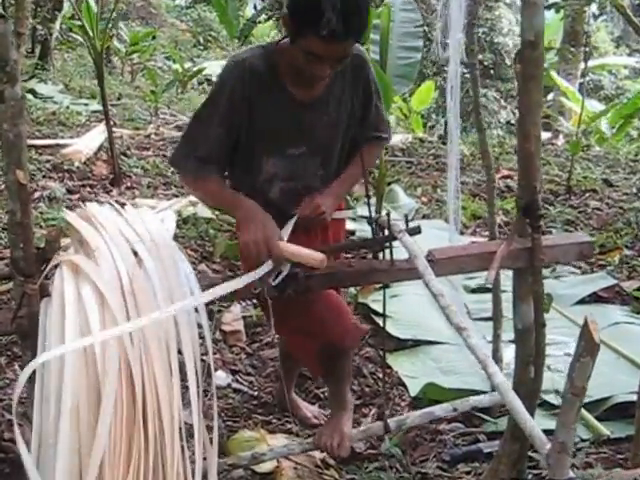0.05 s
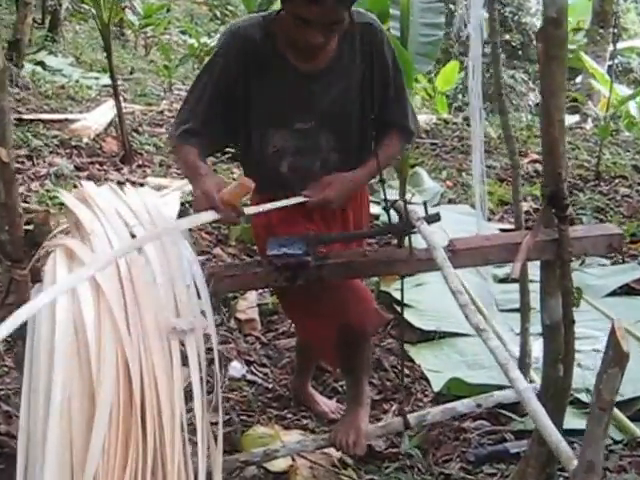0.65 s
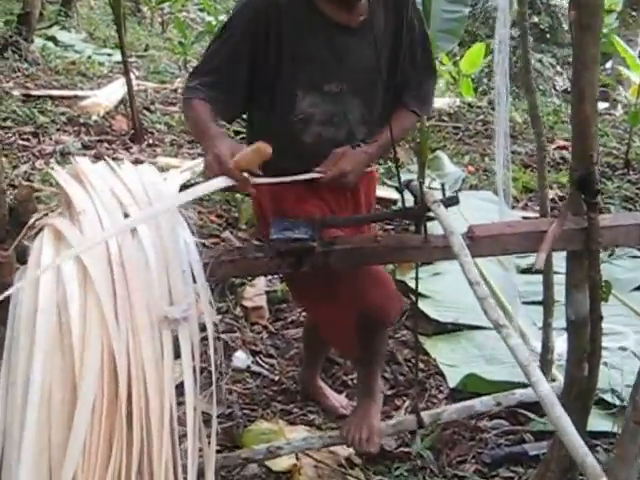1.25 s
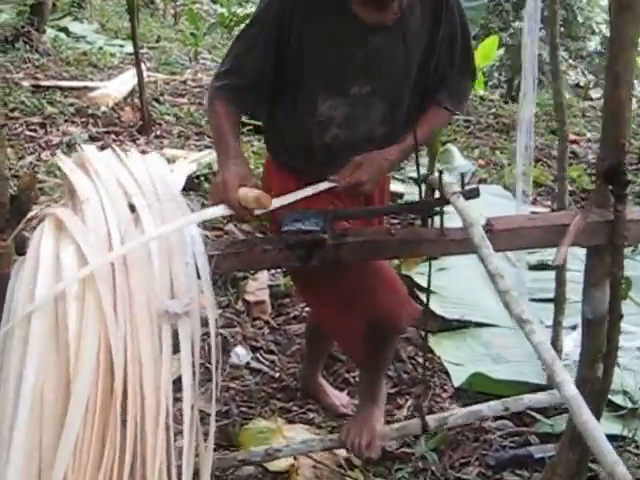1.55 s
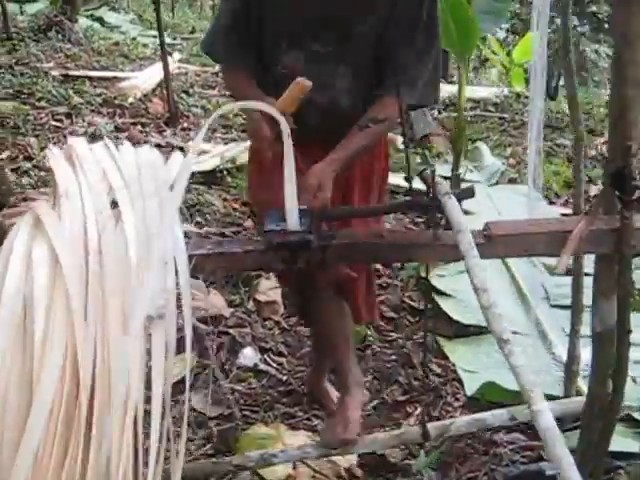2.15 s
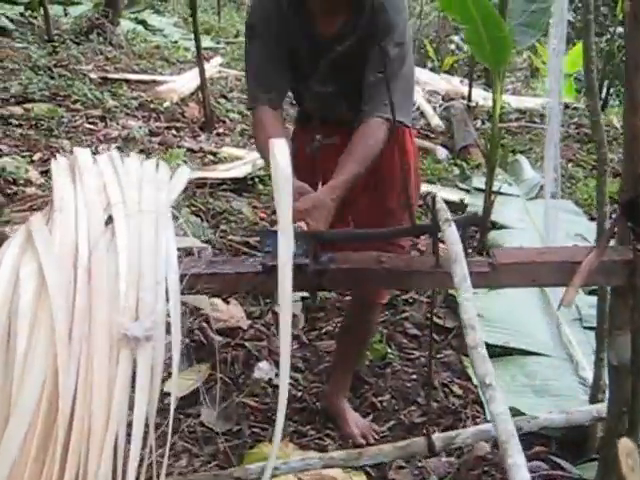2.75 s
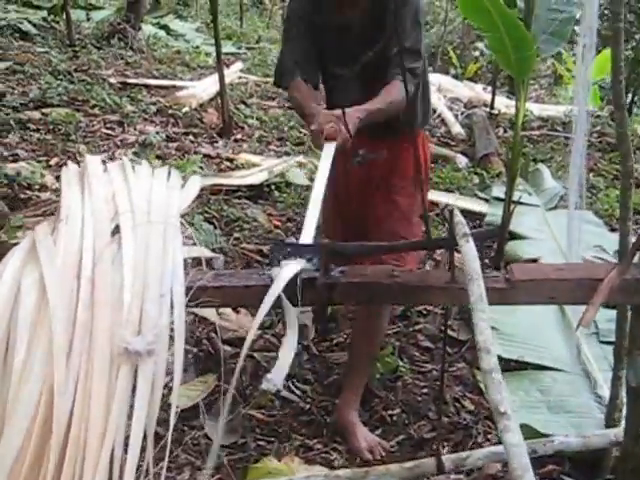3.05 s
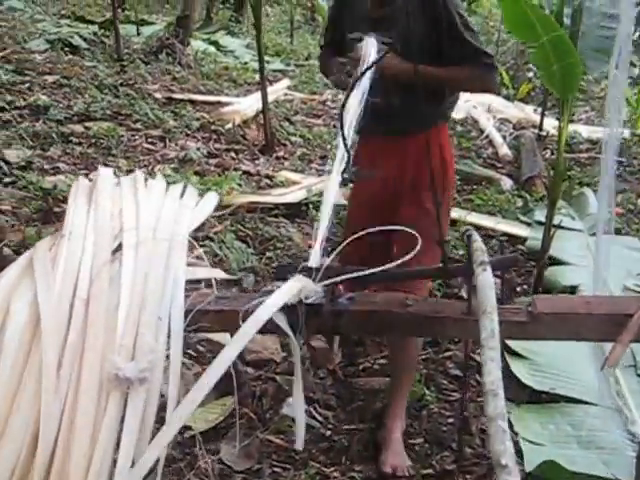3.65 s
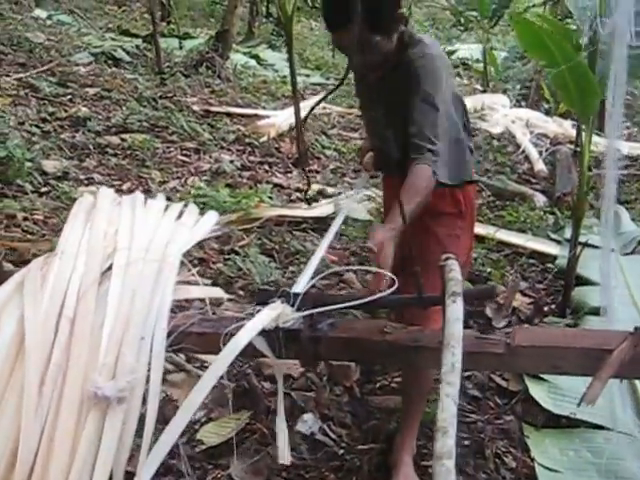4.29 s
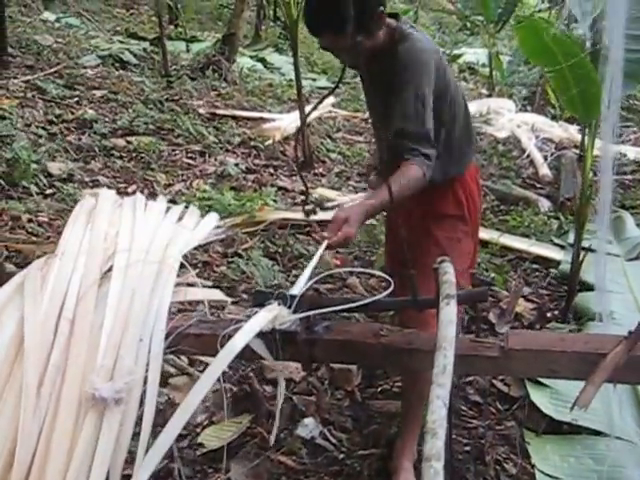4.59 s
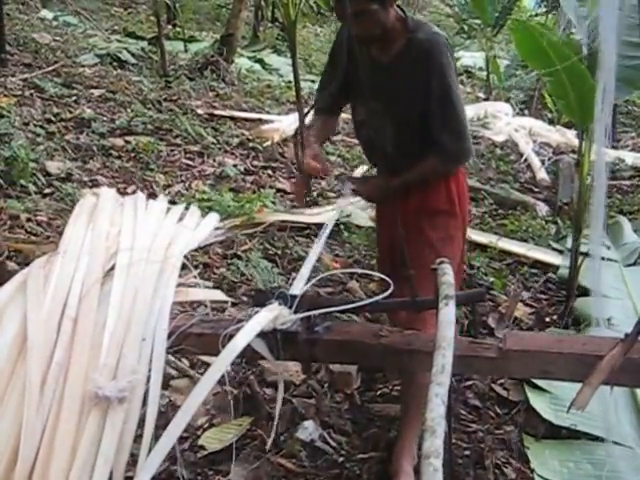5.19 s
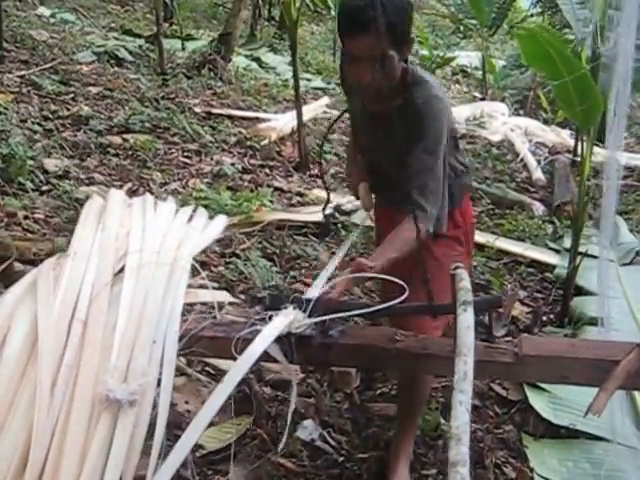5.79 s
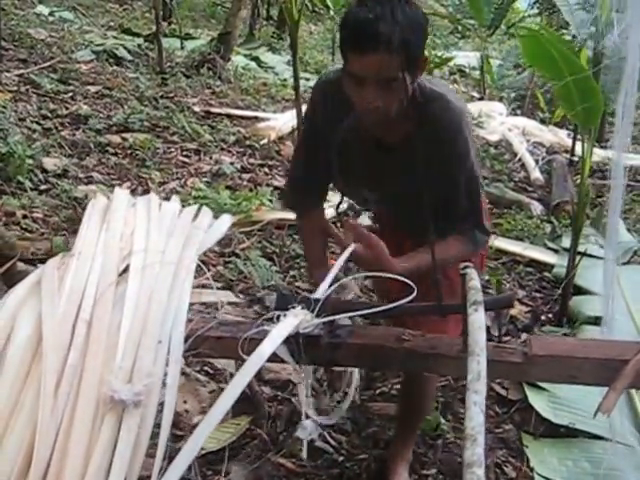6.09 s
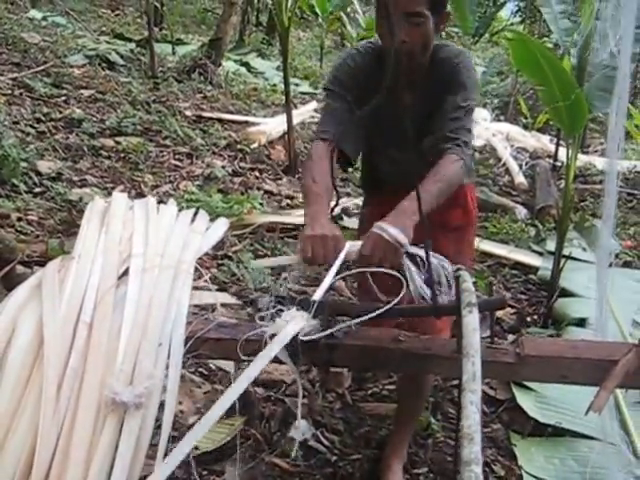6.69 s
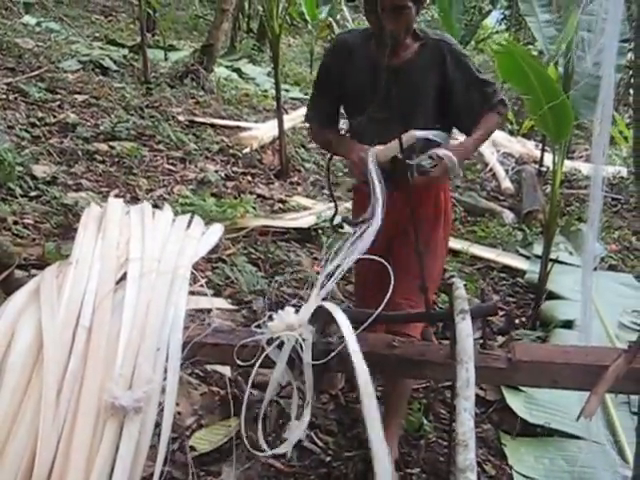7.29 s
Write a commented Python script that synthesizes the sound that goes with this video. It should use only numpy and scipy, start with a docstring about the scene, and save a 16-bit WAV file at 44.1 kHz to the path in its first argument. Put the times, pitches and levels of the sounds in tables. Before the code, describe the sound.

Insects drone outdoors while fibre strips are handled and twice scraped under a blade, one tearing free with a snap.

```python
"""Insects drone outdoors, the nearest in quick falling chirps; a thin high whistle sinks away.
Strips of plant fibre rustle and tick as they are handled, among knocks of knife, clamp and feet.
Twice a strip is drawn under a blade clamped to a wooden beam, and rasps as it sticks and slips.
The first tears free with a snap; after two faint far calls, the second catches, then runs."""
import sys
import numpy as np
from scipy import signal
from scipy.fft import rfft, irfft, next_fast_len
from scipy.io import wavfile

SR = 44100
rng = np.random.default_rng(int(sys.argv[2]) if len(sys.argv) > 2 else 0)


def log_audio(samples):
    """Write samples as a 16-bit WAV file to the path given in sys.argv[1]."""
    # one column per channel
    frames = np.atleast_2d(samples).T
    # limit to full scale, then quantise
    limited = np.clip(frames, -1, 1)
    pcm = np.round(limited * 32767).astype(np.int16)
    wavfile.write(sys.argv[1], SR, pcm)


N = 323615
TIME = np.arange(N) / SR


def from_db(db):
    """Decibels to gain."""
    return 10 ** (np.asarray(db) / 20)


def rms_one(x):
    """Scale to rms 1."""
    return x / np.sqrt(np.mean(x ** 2) + 1e-20)


def in_time(rows):
    """Columns of a (time_s, ...) curve at every sample."""
    time_s, *columns = np.transpose(rows)
    return [np.interp(TIME, time_s, column) for column in columns]


def colour(x, spectrum):
    """Filter by a (freq_hz, gain_db) curve; rms 1."""
    size = next_fast_len(N)
    hz, db = np.transpose(spectrum)
    bins_hz = np.maximum(np.arange(size // 2 + 1) * SR / size, 1)
    gain = from_db(np.interp(np.log(bins_hz), np.log(hz), db))
    return rms_one(irfft(rfft(x, size) * gain, size)[:N])


def drift(rate_hz):
    """Slow random wander; rms 1."""
    r = np.exp(-80 * np.pi * rate_hz / SR)
    slow = signal.lfilter([1], [1, -2 * r, r * r], rng.standard_normal(N // 40 + 2002))[2000:]
    return np.interp(np.arange(N) / 40, np.arange(len(slow)), rms_one(slow))


def sine(hz):
    """Tone following a pitch curve."""
    return np.sin(2 * np.pi * np.cumsum(hz) / SR)


def band(x, low_hz, high_hz):
    """Causal band-pass."""
    high_hz = min(high_hz, .45 * SR)
    edges_hz = [min(low_hz, high_hz / 1.1), high_hz]
    return signal.sosfilt(signal.butter(2, edges_hz, "band", fs=SR, output="sos"), x)


def resonate(x, hz, width_hz):
    """Resonance whose centre may glide; rms 1."""
    turn = np.exp(2j * np.pi * np.cumsum(hz * np.ones(N)) / SR)
    r = np.exp(-np.pi * width_hz / SR)
    return rms_one((signal.lfilter([1], [1, -2 * r, r * r], x / turn + 1e-18) * turn).real)


def grains(per_s, spread_db):
    """Tiny slips at random moments, mostly small, a few large."""
    sizes = from_db(spread_db * np.minimum(rng.exponential(1, N), 5)) * rng.choice([-1, 1], N)
    return sizes * (rng.random(N) < per_s / SR)


def burst(t60_s, low_hz, high_hz):
    """Decaying band of noise."""
    t = TIME[:SR // 4]
    noise = rng.choice([-1., 1.], len(t))
    return band(noise * from_db(-60 * t / t60_s), low_hz, high_hz) / np.std(band(noise, low_hz, high_hz))


def add(out, start_s, sound):
    """Mix a sound in at start_s."""
    start = max(round(start_s * SR), 0)
    out[start:start + len(sound)] += sound[:N - start]


def garden(air_db=-39.5):
    """Far insects merge into a band of noise; thin whines hang over the hush of open air."""
    chorus_levels = [(0, -36.5), (1.4, -34.5), (2.5, -35), (4.0, -32.5), (4.5, -34.5), (5.5, -33),
                     (6.5, -35.5), (7.34, -36.5)]  # far insects: time_s, level_db
    chorus_spectrum = [(3600, -49), (4200, -11), (4550, -2), (4900, 2.5), (5200, 0.5), (5500, -12),
                       (5900, -17), (7000, -44)]  # far insects: freq_hz, gain_db
    air_spectrum = [(20, -9), (45, -3.5), (70, 3.5), (130, 2.5), (300, -2.5), (800, -1.5), (2000, -4.5),
                    (3400, -1), (4200, -2), (7000, -5), (9000, -4.5), (11400, -8.5), (12500, -17),
                    (16000, -18.5)]  # open air: freq_hz, gain_db
    whines = [(7650, -56.5, .0015), (15150, -65, .0003)]  # steady tones: pitch_hz, level_db, waver_ratio
    out = from_db(in_time(chorus_levels)[0] + drift(30)) * colour(rng.standard_normal(N), chorus_spectrum)
    for hz, db, waver in whines:
        out += from_db(db + 1.9 * drift(29)) * rms_one(sine(hz * (1 + waver * drift(60))))
    return out + from_db(air_db) * colour(rng.standard_normal(N), air_spectrum)


def near_insect(chirps_per_s=21.94, top_hz=5480, fall_hz=1050, duty=.54, scatter_db=-3):
    """Each wing stroke is a falling tone; foliage scatters it into a rough tail."""
    levels = [(0, -34.5), (1.3, -33), (1.42, -51), (3.2, -47), (4.2, -36), (4.5, -45), (4.8, -35.5),
              (6.0, -31.5), (6.4, -35.5), (7.34, -38.5)]  # nearest insect: time_s, level_db
    cycle = (chirps_per_s * TIME + .09 + .03 * drift(3)) % 1
    stroke = np.minimum(cycle / duty, 1)
    hz = (top_hz - fall_hz * stroke) * (1 + .01177 * drift(79))
    envelope = np.abs(np.sin(np.pi * stroke)) ** .44 * from_db(2.7 * drift(150) - 1.4 * stroke)
    chirps = envelope * sine(hz)
    foliage = burst(t60_s=.18, low_hz=4530, high_hz=5550)
    scattered = rms_one(signal.fftconvolve(chirps, foliage)[:N])
    return from_db(in_time(levels)[0]) * rms_one(rms_one(chirps) + from_db(scatter_db) * scattered)


def whistle(start_hz=8700, rest_hz=7900, sink_s=.52, hold_s=.58, fade_db_per_s=90):
    """A thin, fluttering call, perhaps a bird, sinks and fades."""
    hz = rest_hz + (start_hz - rest_hz) * np.exp(-TIME / sink_s)
    level_db = -36.5 - fade_db_per_s * np.maximum(TIME - hold_s, 0)
    tone = sine(hz * (1 + .005 * drift(120)))
    return from_db(level_db + 5.3 * drift(30)) * tone


def handling(attack_s=.048, release_s=.059):
    """Damp strips rub together in clumps of fine grains; overlapping strokes add in power."""
    strokes = [(-.02, 0.23, -36.5, 1), (0.227, 0.15, -43, 6), (0.356, 0.056, -40, 6.5),
               (0.462, 0.23, -46.5, 5), (0.815, 0.15, -41.5, 7.5), (1.04, .06, -37.5, 9.5),
               (1.116, 0.23, -37, 0.5), (1.55, .12, -48.5, 8.5), (1.663, 0.1, -36, 3.5),
               (1.795, 0.16, -40, 4), (1.874, .17, -34, 6), (2.129, 0.29, -46, 10), (2.421, 0.29, -38, 3),
               (2.746, 0.2, -50, 10), (3.498, 0.12, -34, 2), (3.64, 0.078, -42.5, 8),
               (3.735, 0.13, -46.5, 4.5), (3.978, 0.073, -38, -4), (4.055, 0.046, -49, 8),
               (4.14, .14, -51, 5), (5.245, 0.095, -43, 3), (5.326, 0.22, -41.5, 4)]  # strip sliding through the hands: start_s, length_s, level_db, body_db
    swish_spectrum = [(1500, -47), (3000, -10.5), (4500, 0), (6000, 1), (7800, 4.5), (9500, -1),
                      (11500, -4), (14000, -12.5), (16000, -22)]  # bright swish: freq_hz, gain_db
    body_spectrum = [(150, -23), (350, -9), (550, -2), (750, 0.5), (1050, 1.5), (1500, -3.5), (2200, -2),
                     (3200, -1.5), (5000, -7), (10000, -39)]  # papery body: freq_hz, gain_db
    clumps = rms_one(grains(per_s=6000, spread_db=2.5) * from_db(1.62 * drift(45)))
    rubs = clumps + from_db(-11.5) * rms_one(grains(per_s=60, spread_db=2.5))
    swish = colour(rubs, swish_spectrum)
    body = colour(rubs, body_spectrum) * from_db(1.36 * drift(9))
    swish_power, body_power = np.zeros((2, N))
    for start_s, length_s, level_db, body_db in strokes:
        rise = np.clip((TIME - start_s) / attack_s, 0, 1)
        fall = np.exp(-np.clip((TIME - start_s - length_s) / release_s, 0, 20))
        swish_power += (rise * fall * from_db(level_db)) ** 2
        body_power += (rise * fall * from_db(level_db + body_db)) ** 2
    return from_db(4.5) * np.sqrt(swish_power) * swish + np.sqrt(body_power) * body


def knocks(ring_cycles=30):
    """Dull contacts with a small click; the higher the pitch, the shorter the ring."""
    contacts = [(0.069, -28, 710), (0.65, -23.5, 785), (0.889, -18.5, 1000), (1.104, -19, 1100),
                (1.475, -31.5, 555), (1.554, -30.5, 543), (1.637, -21.5, 920), (1.791, -24.5, 1000),
                (2.644, -19.5, 1540), (3.664, -25, 690), (3.814, -28, 925), (3.931, -31, 730),
                (4.169, -37, 200), (4.261, -26, 1270), (4.337, -22.5, 1390), (4.395, -21, 2500),
                (4.698, -25.5, 830), (4.744, -18, 2840), (5.533, -18, 1870), (5.782, -28.5, 990),
                (5.792, -23, 1030)]  # knife, clamp and feet: start_s, level_db, pitch_hz
    out = np.zeros(N)
    for start_s, db, hz in contacts:
        thud = burst(t60_s=ring_cycles / hz, low_hz=hz / 1.42, high_hz=hz * 1.28)
        click = burst(t60_s=.0073, low_hz=900, high_hz=5000)
        add(out, start_s, from_db(db) * (from_db(-2.5) * thud + from_db(-3.5) * click))
    return out


def cracks():
    """A fibre breaks with a sharp click, splinters and a short crisp tail."""
    breaks = [(0.2497, -25, 7420), (0.8897, -20, 3990), (1.3535, -23, 4600), (1.9513, -13, 4560),
              (1.9866, -12.5, 6150), (2.1991, -19, 6120), (2.3036, -21, 5730), (2.65, -17.5, 5240),
              (2.8384, -22, 4400), (3.723, -12, 4500), (4.002, -9, 5340), (4.0165, -17, 6850),
              (4.037, -12.5, 4430), (4.1448, -24.5, 6500), (5.5337, -23, 3880), (5.5592, -19, 5040)]  # single fibres: start_s, level_db, pitch_hz
    out = np.zeros(N)
    for start_s, db, hz in breaks:
        click = band(signal.unit_impulse(SR // 4, SR // 2000), hz / 1.6, hz * 1.6)
        splinters = from_db(6.5) * burst(t60_s=.0036, low_hz=hz / 1.5, high_hz=hz * 1.29)
        tail = from_db(-12) * burst(t60_s=.047, low_hz=2500, high_hz=11600)
        add(out, start_s, from_db(db) * (2 * click / np.abs(click).max() + splinters + tail))
    return out


def blade(slips):
    """Slips ring the blade; the pressing strip shifts its modes a little."""
    modes = [(2040, 140, -15), (2460, 106, -11.5), (3000, 290, -15), (3536, 220, -5.5), (4380, 260, -14.5)]  # blade modes: pitch_hz, width_hz, level_db
    out = np.zeros(N)
    for k, (hz, width_hz, db) in enumerate(modes):
        gain = (-1) ** k * from_db(db + 2 * drift(15))
        out += gain * resonate(slips, hz * (1 + .03 * drift(8)), width_hz)
    return out


def pulls(attack_s=.031, release_s=.05, ring_db_per_s=38, beam_db_per_s=45.5):
    """Stick-slip shakes blade, strip and beam; strip and beam each fade away from their own peak."""
    # strip under the blade: start_s, stop_s, ring_peak_s, ring_db, beam_peak_s, beam_db
    draws = [(2.897, 3.567, 3.165, -25, 3.292, -22), (6.692, 7.207, 6.62, -23, 6.71, -29.5)]
    bites = [
        [(2.93, -21, -21.5), (3.02, -26, -24.5), (3.09, -25, -20), (3.15, -28, -25.5), (3.19, -22.5, -26.5),
         (3.35, -27.5, -24), (3.42, -22, -32), (3.46, -22, -27), (3.53, -24.5, -32)],
        [(6.71, -23.5, -31), (6.745, -25.5, -25.5), (6.78, -24, -30), (6.81, -22, -24.5), (6.86, -23, -32.5),
         (6.99, -23.5, -22.5), (7.06, -22.5, -22.5), (7.17, -26.5, -29.5)],
    ]  # bite of the edge, per pull: time_s, rasp_db, hiss_db
    strip_modes = [
        [(2.92, 860, 2990, -8), (3.02, 938, 2980, 0), (3.06, 827, 2720, -1), (3.13, 860, 2570, -1),
         (3.3, 900, 2720, -6), (3.42, 1020, 2890, 2), (3.5, 1120, 3180, -12)],
        [(6.76, 1052, 2930, -11), (6.8, 910, 2840, -8), (6.85, 905, 2670, 8.5), (6.98, 822, 3270, -13),
         (7.2, 926, 3720, -12)],
    ]  # taut strip, per pull: time_s, ring_hz, squeal_hz, squeal_db
    rasp_spectrum = [(150, -23), (500, -19), (1200, -7), (1750, -5), (2050, -6.5), (2500, 0.5), (3100, 2),
                     (3700, 0), (4150, -3), (5300, 0.5), (6500, -7.5), (9000, -17.5), (16000, -40)]  # rasp at the edge: freq_hz, gain_db
    hiss_spectrum = [(3000, -39.5), (5500, -3), (7200, 3), (8500, -0.5), (10500, -2.5), (13000, -7.5),
                     (16000, -19)]  # hiss at the edge: freq_hz, gain_db
    beam_spectrum = [(200, -27), (450, -16), (600, -6), (750, 0), (900, -10.5), (1100, 0), (1380, -1),
                     (1520, -4), (1750, -9.5), (2500, -9), (6000, -38)]  # wooden beam: freq_hz, gain_db
    ring_hz, squeal_hz, squeal_db = in_time(np.vstack(strip_modes))
    slips = grains(per_s=8000, spread_db=2.5) * from_db(1.2 * drift(51))
    rasp = colour(slips, rasp_spectrum) + blade(slips)
    squeal_slips = grains(per_s=2500, spread_db=1)
    squeal = resonate(squeal_slips, squeal_hz * (1 + .021 * drift(18)), width_hz=190)
    rasp += from_db(squeal_db - 5) * squeal
    hiss = colour(slips, hiss_spectrum) * from_db(.88 * drift(25) - 1.5)
    beam_mode = resonate(slips, 1360 * (1 + .018 * drift(29)), width_hz=89)
    beam = colour(slips, beam_spectrum) + from_db(-10.5) * beam_mode
    strip = resonate(grains(per_s=2400, spread_db=2), ring_hz * (1 + .008 * drift(25)), width_hz=55)
    strip = band(strip, 550, 1430) * from_db(1.15 * drift(16) - 3)
    out = np.zeros(N)
    for (start_s, stop_s, ring_peak_s, ring_db, beam_peak_s, beam_db), bite in zip(draws, bites):
        rasp_db, hiss_db = in_time(bite)
        speed = np.clip(np.minimum((TIME - start_s) / attack_s, (stop_s - TIME) / release_s), 0, 1)
        ringing = from_db(ring_db - ring_db_per_s * np.abs(TIME - ring_peak_s)) * strip
        shaking = from_db(beam_db - beam_db_per_s * np.abs(TIME - beam_peak_s)) * beam
        out += speed * (from_db(rasp_db) * rasp + from_db(hiss_db) * hiss + ringing + shaking)
    return band(out, 230, 21000)


def jolts(blows, spectrum, t60_s):
    """A quick run of blows, each a decaying burst of coloured noise."""
    envelope = np.zeros(N)
    for start_s, db in blows:
        add(envelope, start_s, from_db(db - 60 * TIME[:SR // 4] / t60_s))
    return envelope * colour(rng.standard_normal(N), spectrum)


def jerks():
    """Sudden changes of tension jolt blade and beam: one strip tears free, the next catches."""
    tear = [(3.9902, -9), (3.9948, -12.5)]  # blows of the tear: start_s, level_db
    tear_spectrum = [(59, -32), (100, -5), (277, 0), (930, -7.5), (1390, -1.5), (3400, -7), (6700, -7.5),
                     (11900, -16), (16000, -31)]  # tear: freq_hz, gain_db
    catch = [(6.6873, -11.5), (6.692, -5), (6.6985, -16)]  # blows of the catch: start_s, level_db
    catch_spectrum = [(120, -59), (200, -36), (1040, 4), (1530, 1), (3130, -15), (4860, -3.5), (5520, -14),
                      (10100, -19.5), (16000, -43)]  # catch: freq_hz, gain_db
    out = jolts(tear, tear_spectrum, t60_s=.032) + jolts(catch, catch_spectrum, t60_s=.026)
    beam_thump = from_db(-17.5) * burst(t60_s=.031, low_hz=120, high_hz=420)
    add(out, tear[0][0], beam_thump)
    return band(out, 90, 17000)


def peeps():
    """Short, blurred calls from far off, perhaps birds."""
    calls = [(4.8, .12, 3220, -47), (4.831, .035, 8200, -36)]  # far calls: start_s, length_s, pitch_hz, level_db
    out = np.zeros(N)
    for start_s, length_s, hz, db in calls:
        swell = np.sin(np.pi * np.clip((TIME - start_s) / length_s, 0, 1))
        out += from_db(db) * swell * resonate(rng.standard_normal(N), hz, width_hz=300)
    return out


def among_trees(x, echo_db=-19, onset_s=.011):
    """Ground and trunks scatter a faint, short tail."""
    tail = burst(t60_s=.18, low_hz=302, high_hz=7000) * np.minimum(TIME[:SR // 4] / onset_s, 1)
    return x + from_db(echo_db) * signal.fftconvolve(x, tail / np.linalg.norm(tail))[:N]


def scene():
    """Work and garden, the same in both channels."""
    work = among_trees(pulls() + handling() + cracks() + knocks() + jerks())
    return np.tile(work + near_insect() + garden() + whistle() + peeps(), (2, 1))


def record(dry, cutoff_hz=15850):
    """Soft clip, then a steep low-pass."""
    rounded = .95 * np.tanh(dry / .95)
    return signal.sosfilt(signal.ellip(12, .1, 80, cutoff_hz, fs=SR, output="sos"), rounded)


dry = scene()
out = record(dry)
log_audio(out)
```